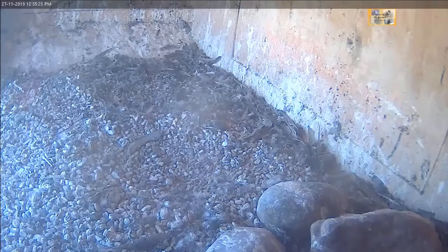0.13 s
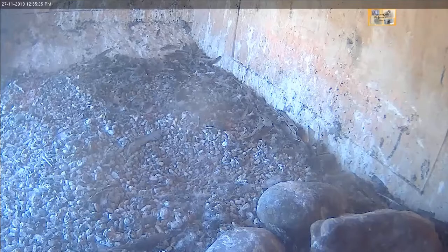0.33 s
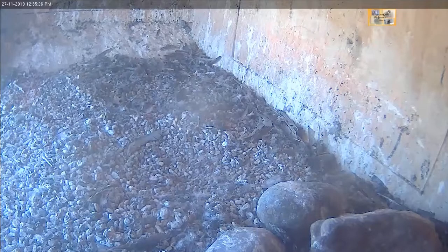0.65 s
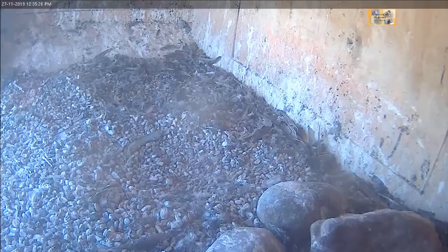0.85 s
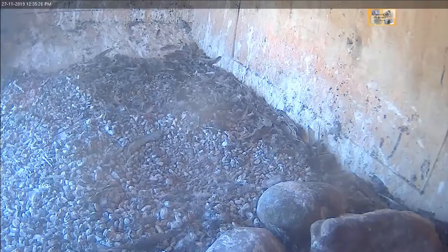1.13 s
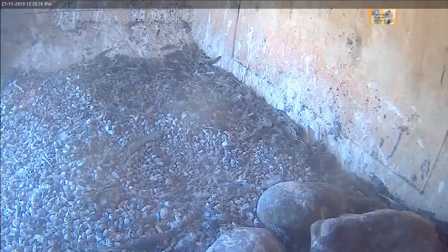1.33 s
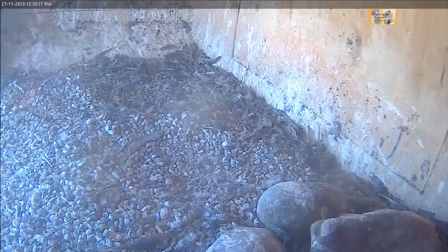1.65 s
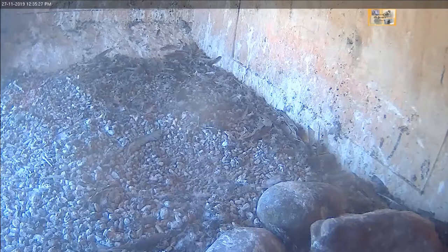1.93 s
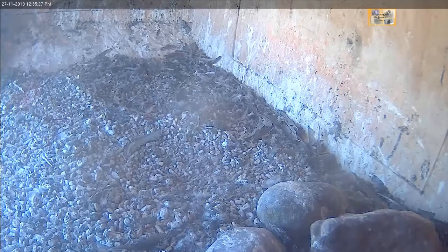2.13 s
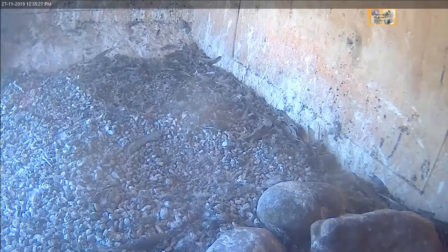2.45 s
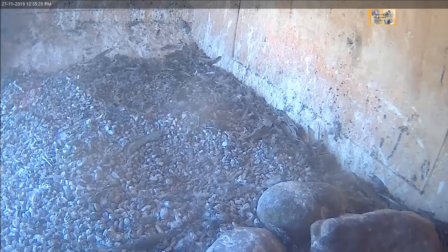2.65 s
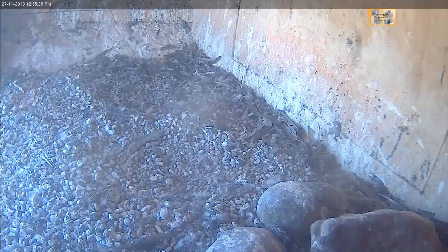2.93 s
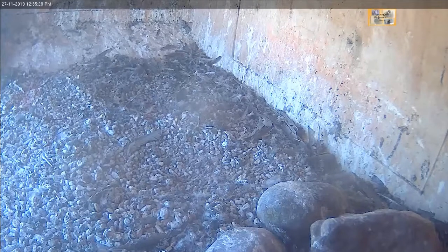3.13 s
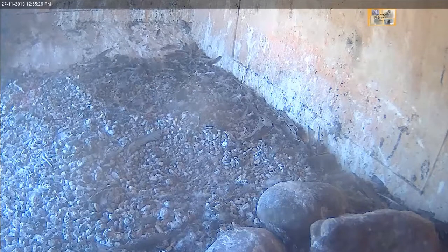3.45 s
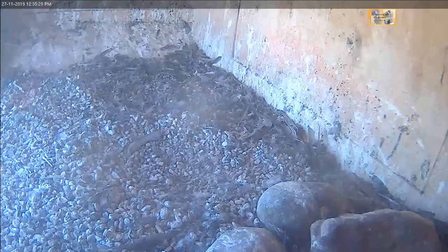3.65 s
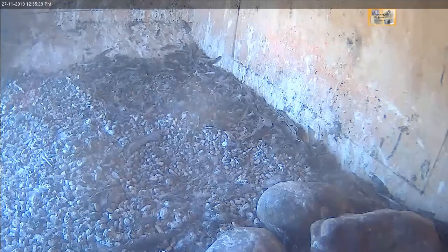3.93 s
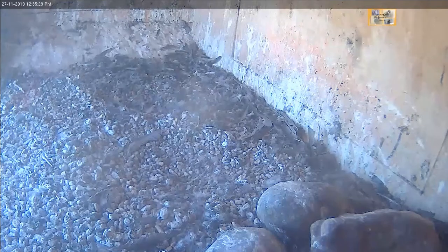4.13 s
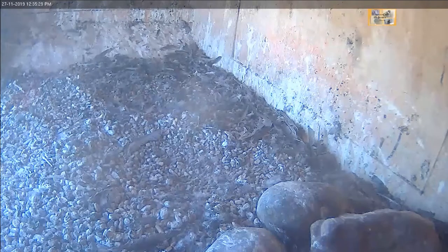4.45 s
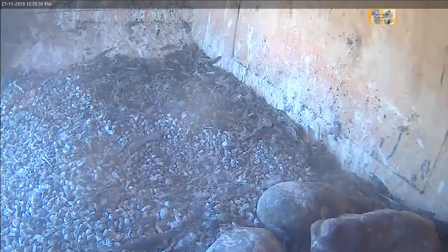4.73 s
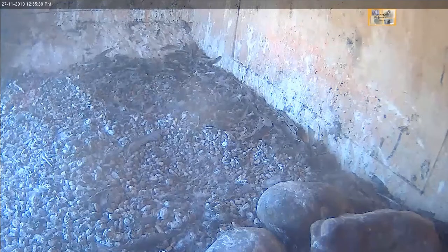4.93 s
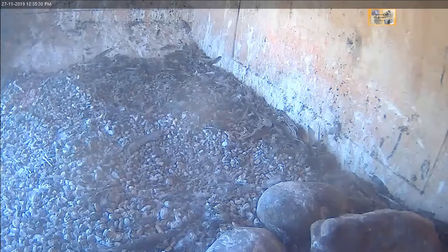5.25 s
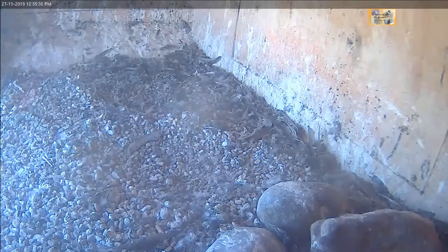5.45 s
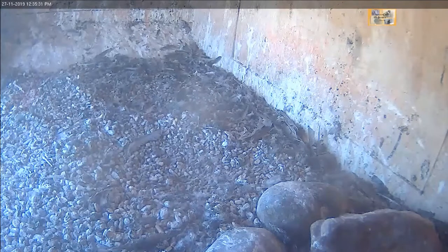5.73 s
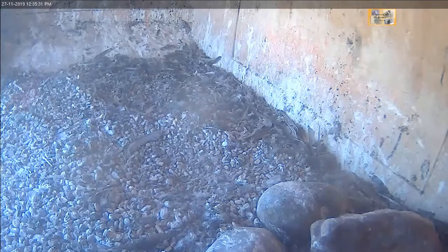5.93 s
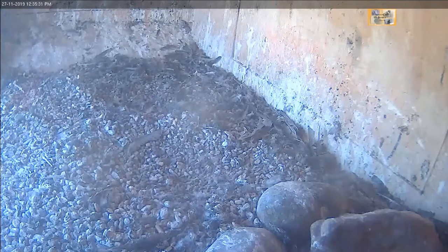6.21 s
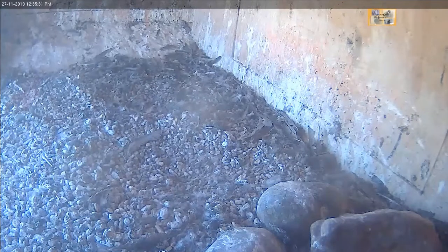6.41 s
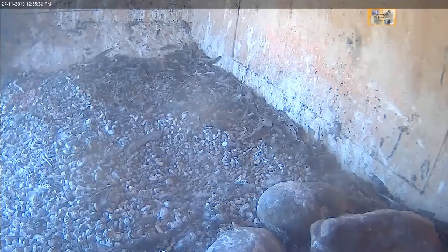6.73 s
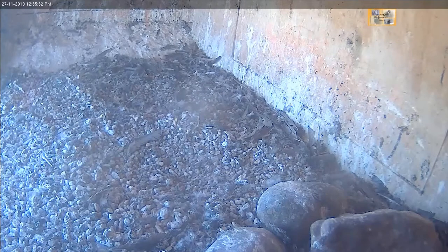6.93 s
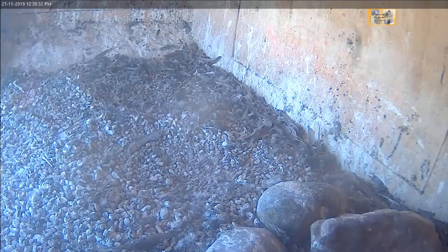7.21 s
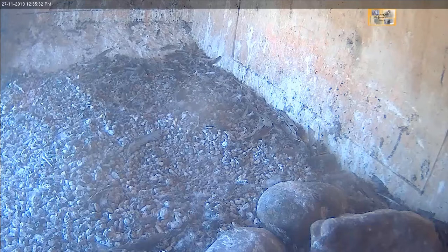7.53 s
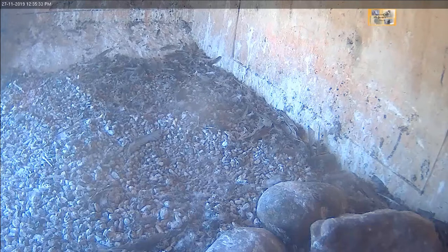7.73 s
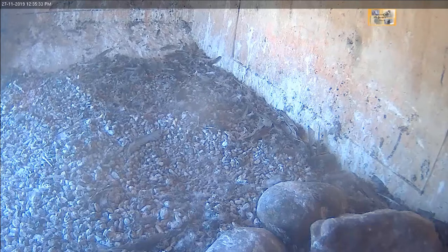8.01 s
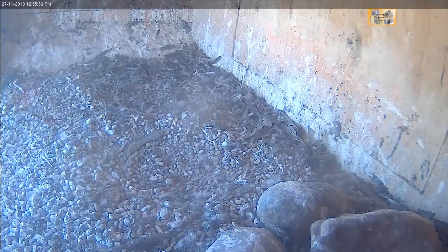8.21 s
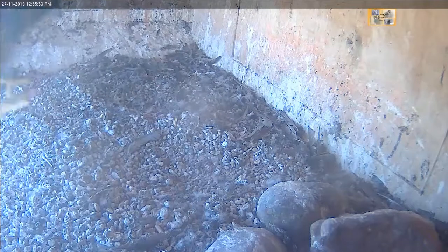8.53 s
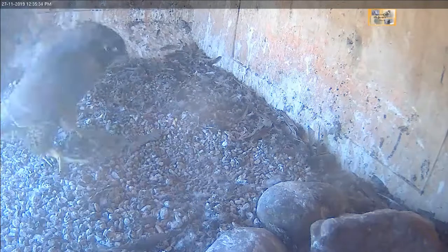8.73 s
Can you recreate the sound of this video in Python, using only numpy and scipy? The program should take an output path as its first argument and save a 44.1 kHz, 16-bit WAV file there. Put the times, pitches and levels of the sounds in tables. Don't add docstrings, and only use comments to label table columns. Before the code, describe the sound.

A young falcon cackles very close to a small camera microphone in a hollow wooden nest box. Short, rasping, nasal honks repeat about four times a second, each arching up then falling. They run steadily at first, then grow higher, louder and more strained. Faint low traffic rumble, thin electronic whine and hiss lie beneath. Tiny dropouts nick the sound, which breaks off mid-call near the end.

```python
import sys
import numpy as np
from scipy import signal
from scipy.fft import rfft, irfft, next_fast_len
from scipy.io import wavfile
from scipy.ndimage import uniform_filter1d, map_coordinates

SR = 44100
rng = np.random.default_rng(int(sys.argv[2]) if len(sys.argv) > 2 else 0)


def ratio(d):
    e = np.asarray(d, float) / 20
    return 10 ** e


def wav_out(sig):
    wavfile.write(sys.argv[1], SR, np.round(np.clip(np.atleast_2d(sig).T, -1, 1) * 32767).astype(np.int16))


N = 391166
TIME = np.arange(N) / SR
STRAIN_HZ = 295.4


def unit(x):
    return x / np.sqrt(np.mean(x ** 2) + 1e-20)


def along(points, hz):
    f, v = np.transpose(points)
    return np.interp(np.log(hz + 1), np.log(f + 1), v)


def wobble(rate):
    knots = rng.standard_normal(int(N * rate / SR) + 4)
    return map_coordinates(knots, [TIME * rate])


def filtered(x, response):
    m = next_fast_len(N + SR // 2)
    return irfft(rfft(x, m) * response(np.fft.rfftfreq(m, 1 / SR)), m)[:N]


def causal(spectrum):
    def response(hz):
        cepstrum = irfft(np.log(ratio(along(spectrum, hz)) + 1e-6))
        cepstrum[1:len(hz) - 1] *= 2
        cepstrum[len(hz):] = 0
        return np.exp(rfft(cepstrum))
    return response


# (frequency [Hz], width [Hz], level [dB])
BOX_MODES = [(426.6, 23.4, 19), (1056, 39, 5), (1422, 100, 9.5), (1870, 38, 6.5), (2272, 24, 9),
             (2630, 37, 2.5), (2660, 230, 3.5), (2923, 140, 8), (3500, 94, 4), (3846, 93, 5.5),
             (4290, 120, 4.5), (5970, 27, -8), (6850, 60, 9.5)]


def standing(f):
    response = 1
    for centre, width, db in BOX_MODES:
        response = response + (ratio(db) - 1) * 1j * f * width / (centre ** 2 - f * f + 1j * f * width)
    return response


# (frequency [Hz], density [dB per Hz])
TOWN_COLOUR = [(12, -31), (20, -7.5), (75, -5), (157, -10.5), (200, -12), (244, -14), (289, 3),
               (508, -40.5), (1140, -29.5), (1290, -27), (1690, -43), (2160, -17.5), (4080, -62),
               (6500, -60.5), (7000, -49), (9100, -71), (15400, -120)]
# (time [s], level [dB])
TOWN_LEVEL = [
    (0, -49),
    (2.002, -48),
    (4.5, -49.5),
    (6.998, -47.5),
    (8.9, -48),
]


def town():
    s, level_db = np.transpose(TOWN_LEVEL)
    rumble = filtered(rng.standard_normal(N), lambda f: ratio(along(TOWN_COLOUR, f)) * standing(f))
    return ratio(np.interp(TIME, s, level_db) + 6 + 1.2 * wobble(4)) * unit(rumble)


def hum():
    return ratio(-77) * unit(filtered(rng.standard_normal(N), lambda hz: 1 / (1 + (hz / 110) ** 3)))


def hiss():
    return ratio(-67) * unit(filtered(rng.standard_normal(N), lambda f: f > 3500))


# (from [s], to [s])
DROPOUTS = [
    (.699, .7307),
    (.9554, .9791),
    (1.8513, 1.8826),
    (2.763, 2.7788),
    (3.9551, 3.9948),
    (4.7472, 4.7626),
    (6.2827, 6.299),
    (6.923, 6.9388),
    (7.819, 7.8351),
    (8.6031, 9),
]


def whine():
    picture_s = 1 / 30
    flowing = 1 - sum((TIME > a) & (TIME < b) for a, b in DROPOUTS)
    since = (np.cumsum(flowing) / SR - .0045) % picture_s
    tone = np.sin(2 * np.pi * 7262 * since) * np.clip(since / 0.004, 0, 1) * ratio(-90 * since)
    click = np.sin(2 * np.pi * 6400 * since) * ratio(-11.0 - 60 * since / .008)
    return ratio(-63.5) * (tone + click)


def played(s):
    return s - sum(np.clip(s - a, 0, b - a) for a, b in DROPOUTS)


# (start [s], swell [s], fall [s], peak level [dB],
# top pitch [Hz])
FALCON_CALLS = [ (0.040, 0.095, 0.068, -24, 269), (0.295, 0.078, 0.061, -20.5, 299),
                (0.529, 0.073, 0.064, -20, 281), (0.754, 0.075, 0.065, -19, 287),
                (0.998, 0.069, 0.073, -18, 284), (1.253, 0.075, 0.08, -19.5, 281),
                (1.584, 0.073, 0.074, -21.5, 263), (1.826, 0.1, 0.07, -19.5, 266),
                (2.127, 0.085, 0.064, -20.5, 272), (2.381, 0.1, 0.043, -21.5, 289),
                (2.658, 0.075, .066, -22, 274), (2.937, 0.09, 0.065, -23.5, 281),
                (3.213, 0.095, 0.064, -21.5, 284), (3.468, .078, 0.062, -20.5, 296),
                (3.700, 0.068, .062, -21, 317.3), (3.929, .022, .084, -22, 311.3),
                (4.173, 0.086, 0.057, -21, 320.3), (4.434, 0.089, 0.075, -22, 326.1),
                (4.721, 0.093, 0.064, -21.5, 279), (5.031, 0.098, 0.056, -21, 262),
                (5.348, 0.095, 0.05, -20.5, 275.1), (5.609, 0.089, 0.057, -19.5, 318.8),
                 (5.841, 0.078, 0.063, -20.5, 339.6), (6.083, 0.086, 0.059, -23.5, 329),
                 (6.345, 0.086, .064, -22.5, 318.3), (6.605, 0.086, 0.067, -21, 277.5),
                 (6.848, .070, .068, -20.5, 352.1), (7.080, 0.083, 0.06, -17.5, 336.4),
                 (7.313, 0.077, 0.073, -17, 307.6), (7.559, .078, .076, -18, 320.6),
                 (7.854, 0.089, 0.063, -17, 290.1), (8.130, .084, .066, -17.5, 385),
                 (8.339, .078, .064, -15, 402), (8.528, .076, .070, -18, 434.2),]
CACKLES = FALCON_CALLS


def effort():
    slack_hz, lag_s, climb_bend = 212.6, .010, 1.7
    sink, sink_bend = .9, 1.3
    calls = np.array(CACKLES)
    current = np.maximum(np.searchsorted(calls[:, 0], TIME) - 1, 0)
    start, swell, fall, peak_db, top_hz = calls[current].T
    played_start = np.interp(start, calls[:, 0], played(calls[:, 0]))
    since = np.maximum(played(TIME) - played_start, 0)
    up = np.clip(since / swell, 0, 1)
    down = np.clip((since - swell) / fall, 0, 1)

    climb = np.sin(np.pi / 2 * np.clip((since - lag_s) / (swell - lag_s), 0, 1)) ** climb_bend
    pitch_hz = slack_hz + (top_hz - slack_hz) * (climb - sink * down ** sink_bend)
    pitch_hz = pitch_hz * (1 + .018 * wobble(30))

    onset_db = -31 + 0.17 * (peak_db - peak_db.mean()) + 0.025 * (top_hz - STRAIN_HZ)
    level_db = onset_db + (peak_db - onset_db) * up ** 0.75
    level_db = level_db - 10.5 * np.clip(1 - since / 0.007, 0, 1)
    level_db = level_db - 6.5 * down - 38 * down ** 5.15
    level_db = level_db + 0.0926 * np.maximum(pitch_hz - STRAIN_HZ, 0)
    return np.clip(since / (swell + fall), 0, 1), down, level_db, pitch_hz


def membrane(cycles, live, flutter_db):
    knots = np.arange(0, N / SR + 1, 1 / 110)
    stack = np.zeros(N)
    for k in range(2, 33):
        curves = rng.standard_normal((2, len(knots)))
        swell, drift = (np.interp(TIME[live], knots, row) for row in curves)
        phase = 2 * np.pi * (k * cycles[live] + rng.random()) + (.5 + .03 * k) * drift
        weak_db = 6.5 if k < 4 else 0
        stack[live] += ratio(flutter_db * swell - weak_db) * np.sin(phase)
    return unit(stack)


def windpipe(x, opening):
    spacing_hz, beak_cut_hz = 1187, 710
    hz, t, z = signal.stft(x, SR, nperseg=512, noverlap=384)
    f, shift = hz[:100, None], .5 * np.interp(t, TIME, opening)
    tube = .1
    for k in range(1, 7):
        centre = spacing_hz * (k - .5 + shift * (1 + 0.32 / k ** 2))
        width = 230 + 25 * k + 300 / k ** 3
        tube = tube + (-1) ** k * 1j * f * width / (centre ** 2 - f * f + 1j * f * width)
    z[:100] *= tube / (1 + (2 * shift * beak_cut_hz / (f + 1)) ** 4)
    return signal.istft(z, SR, nperseg=512, noverlap=384)[1][:N]


# (frequency [Hz], density [dB per Hz])
SYRINX_COLOUR = [(260, -51), (450, -8.5), (560, -8.5), (800, -9.5), (1050, -1.5), (1500, -4), (2200, -2),
                 (3200, 0.5), (4000, -9.5), (5000, -14.5), (6100, -10), (7000, -25), (8000, -36),
                 (16000, -120)]
# (pitch [Hz], level [dB])
CHEST_BOOM = [(210, -20), (245, -15.5), (278, -1), (302, 2), (335, -10), (410, -13)]


def falcon():
    progress, fading, rasp_db, pitch_hz = effort()
    boom_db = along(CHEST_BOOM, pitch_hz)
    sounding = uniform_filter1d(1. * (progress > 0) * (progress < 1), size=70)

    gape = 0.97 + 0.17 * wobble(4) + 0.0032 * (pitch_hz - STRAIN_HZ)
    opening = gape * np.abs(np.sin(np.pi * progress ** 1.06)) ** 0.63

    cycles = np.cumsum(pitch_hz * (1 + .008 * wobble(40))) / SR
    other_side = np.cumsum(1.17 * pitch_hz * (1 + .05 * wobble(25))) / SR
    breath = unit(rng.standard_normal(N) * np.exp(-1.5 * (other_side % 1)))
    hoarse = .2 + .3 * np.clip((pitch_hz - 268) / 35, 0, 1) + .15 * np.sqrt(fading)
    voiced = membrane(cycles, sounding > 0, flutter_db=2.8)
    voiced = voiced * (1 + hoarse * np.sin(2 * np.pi * other_side))
    source = np.sqrt(1 - hoarse) * voiced + np.sqrt(hoarse) * breath
    source = filtered(source, causal(SYRINX_COLOUR))
    rasp = filtered(windpipe(source, opening), standing)

    power = uniform_filter1d(rasp ** 2 * sounding, size=2200)
    power = power / uniform_filter1d(sounding + 1e-3, size=2200)
    rasp = rasp / np.sqrt(np.abs(power) + 1e-4)
    boom = np.sqrt(2) * ratio(rasp_db + boom_db) * np.sin(2 * np.pi * cycles)
    return sounding * ratio(rasp_db) * rasp, sounding * boom


def hollow(f):
    return 1j * f * 70 / (295 ** 2 - f * f + 1j * f * 70)


def walls(x):
    t = np.arange(SR // 16) / SR
    out = np.zeros(N + SR)
    lasting = rng.standard_normal(len(t))
    for start, swell, fall, *_ in CACKLES:
        a = round(start * SR) - 200
        b = round((start + swell + fall) * SR) + 1400
        echoes = lasting + .7 * rng.standard_normal(len(t))
        echoes = echoes * ratio(-60 * t / .06) * (t > .001)
        out[a:b + len(t) - 1] += signal.fftconvolve(x[a:b], echoes / np.linalg.norm(echoes))
    return out[:N]


# (frequency [Hz], decay by 60 dB [s])
YARD_DECAY = [(300, 0.16), (1500, 0.84), (3500, 0.78), (7000, 0.017)]


def yard(x):
    hz, t, z = signal.stft(rng.standard_normal(SR), SR, nperseg=256)
    decay = ratio(-60 * t / along(YARD_DECAY, hz)[:, None])
    tail = signal.istft(z * decay, SR, nperseg=256)[1]
    return filtered(signal.fftconvolve(x, tail / np.linalg.norm(tail))[:N], standing)


def scene():
    surroundings = town() + whine() + hiss()
    rasp, boom = falcon()
    near = ratio(-2.5) * rasp + ratio(-4) * walls(rasp) + ratio(1.5) * filtered(boom, hollow)
    return (near + ratio(-35.5) * yard(rasp + boom) + surroundings)[None]


# (frequency [Hz], level [dB])
MICROPHONE_EDGE = [(7000, 0.5), (7350, 1.5), (7600, 1), (8000, -36.5), (8600, -86.5)]


def microphone(x):
    squeezed = x / (1 + np.abs(x / 1.3) ** 4) ** .25
    return filtered(squeezed, lambda hz: ratio(along(MICROPHONE_EDGE, hz)))


def stream_gate():
    gate_db = np.zeros(N)
    for a, b in DROPOUTS:
        gap = (TIME > a) & (TIME < b)
        since = TIME[gap] - a
        gate_db[gap] = np.where(since < .027, -27 - 650 * since, -90)
    return uniform_filter1d(ratio(gate_db), size=9)


def band_limit(x):
    return signal.sosfilt(signal.butter(12, 7750, fs=SR, output="sos"), x)


def record(dry):
    x = microphone(dry[0]) * stream_gate() + hum()
    return band_limit(np.clip(x, -.9, .9)[None])


dry = scene()
out = record(dry)
wav_out(out)
```